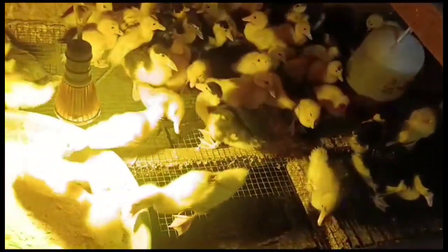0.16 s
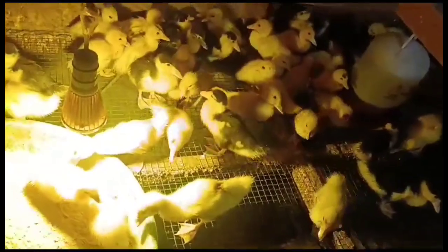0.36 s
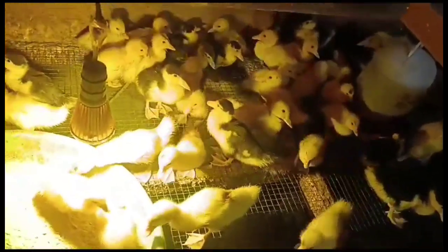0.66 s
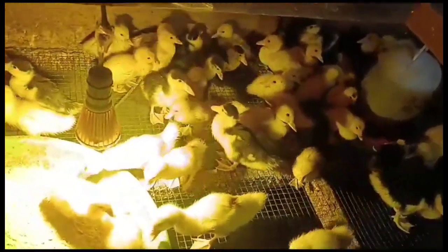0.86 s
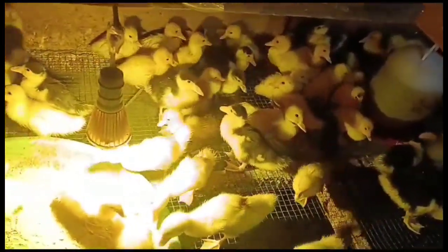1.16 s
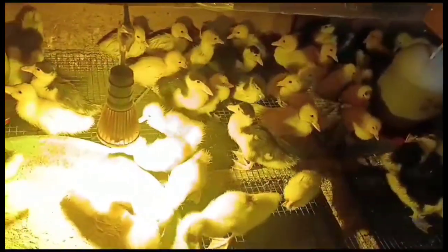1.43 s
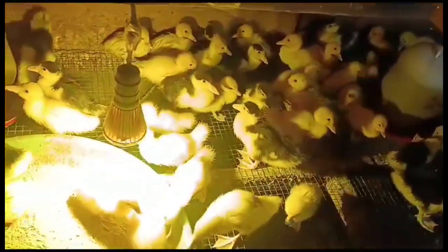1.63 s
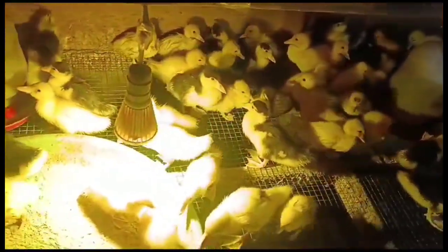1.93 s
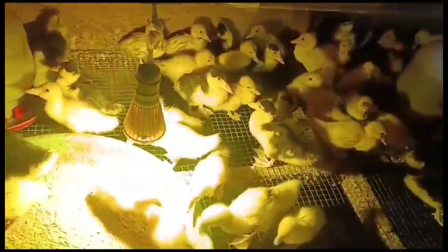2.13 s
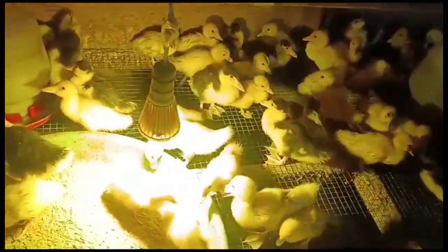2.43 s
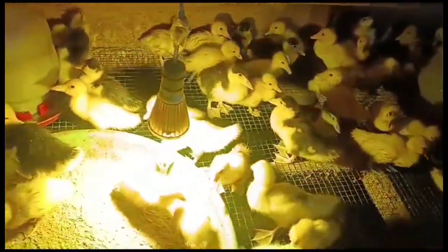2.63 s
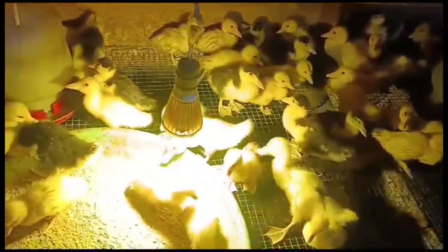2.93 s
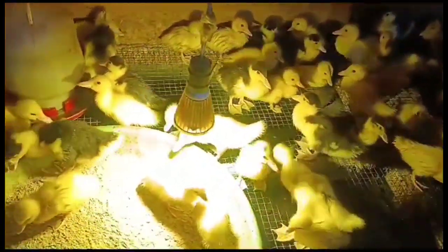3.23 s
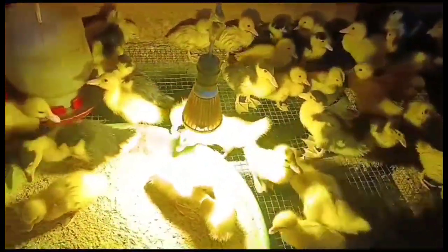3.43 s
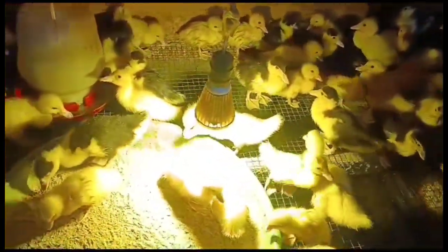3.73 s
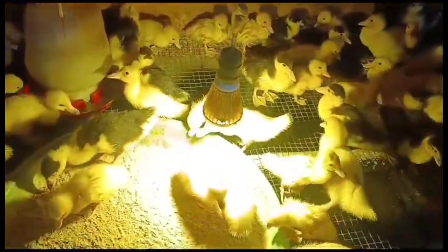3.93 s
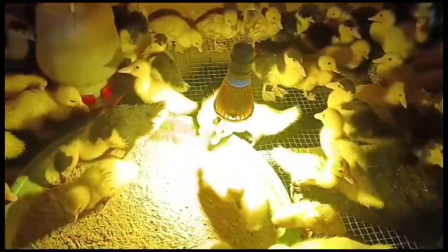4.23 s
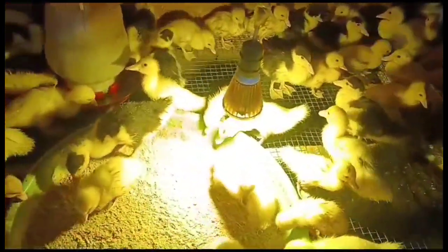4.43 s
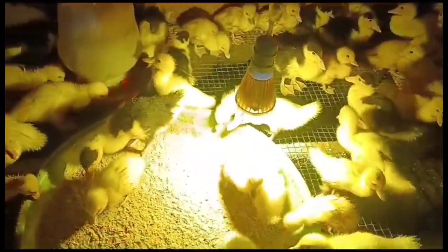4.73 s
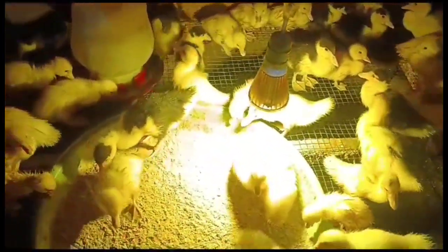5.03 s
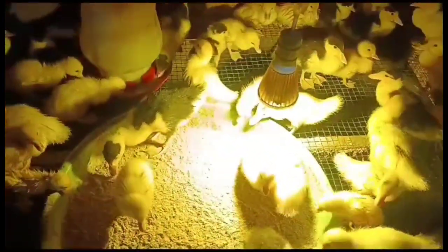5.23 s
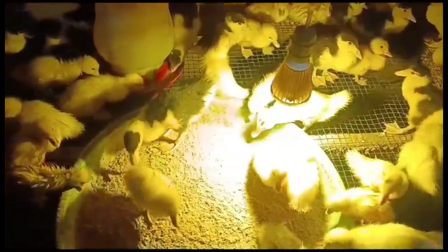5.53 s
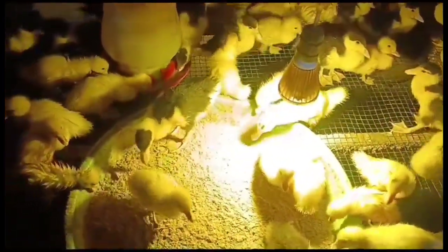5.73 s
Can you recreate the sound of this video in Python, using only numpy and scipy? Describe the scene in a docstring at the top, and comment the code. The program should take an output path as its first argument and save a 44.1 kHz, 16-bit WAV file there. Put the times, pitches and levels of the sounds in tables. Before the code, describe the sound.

Overlapping short duckling chirps, soft knocks and scratching feet over a faint shrill insect whine and a steady cricket, then a dull thud.

```python
"""A crowd of ducklings peeps in a wooden brooder, over a faint rumble, a high insect chorus and a cricket.
The cricket chirps evenly from the start and pauses briefly after 0.6 s; its chirps are shaped noise.
Peeps, murmurs and squeals are whistles on a moving pitch; the crowd is liveliest around 2 s.
Feet thump and rake, wire ticks and bodies knock throughout, most densely near 2.7 s: struck modes and noise.
A first squeal rises at 2.8 s, more from 4.8 s; a heavy bump lands at 5.03 s, then the calls thin out."""
import sys
import numpy as np
from scipy import signal
from scipy.fft import rfft, irfft, next_fast_len
from scipy.io import wavfile

SR = 44100
rng = np.random.default_rng(int(sys.argv[2]) if len(sys.argv) > 2 else 0)


def to_wav(sig):
    """Store sig (one row per channel, or 1-D mono) as 16-bit WAV at the path in sys.argv[1].

    Samples outside -1..1 are clipped; the rate is SR.
    """
    pcm = np.clip(np.atleast_2d(sig), -1, 1) * 32767
    pcm = np.round(pcm).astype(np.int16)
    wavfile.write(sys.argv[1], SR, pcm.T)  # frames by channels


N = 258867
TIME = np.arange(N) / SR  # seconds


def from_db(db):
    """Turn decibels into a gain."""
    return 10 ** (np.asarray(db) / 20)


def rms_one(x):
    """Scale a sound to unit power."""
    return x / np.sqrt(np.mean(x ** 2) + 1e-20)


def at_level(sound, db):
    """Set the level of a blow by its first fiftieth of a second."""
    return from_db(db) * sound / np.sqrt(np.mean(sound[..., :SR // 50] ** 2))


def at_hz(points, hz):
    """Read a table at any pitch, on a log-frequency axis."""
    table_hz, value = np.transpose(points)
    return np.interp(np.log(np.maximum(hz, 1)), np.log(table_hz), value)


def pan(db):
    """Left and right gains; positive decibels make the left louder."""
    return from_db(np.array([[.5], [-.5]]) * db)


def add(out, s, sound):
    """Mix a sound in at a time in seconds."""
    i = int(np.clip(s * SR, 0, N - 1))
    out[..., i:i + sound.shape[-1]] += sound[..., :N - i]


def band(x, hz, kind="band", order=2):
    """Filter that keeps only a range of pitches (Butterworth)."""
    edges = np.clip(np.sort(np.atleast_1d(hz)), 10, .45 * SR).squeeze()
    return signal.sosfilt(signal.butter(order, edges, kind, fs=SR, output="sos"), x)


def drift(rate, size=N):
    """Random wandering with a spread near 1, taking `rate` new values a second."""
    knots = np.arange(size) / SR * rate
    count = int(knots[-1]) + 2
    return np.interp(knots, np.arange(count), rng.standard_normal(count))


def colour(x, spectrum):
    """Give a signal a spectrum, silent outside the table's range; unit power."""
    size = next_fast_len(N)
    hz = np.arange(size // 2 + 1) * SR / size
    inside = (hz > spectrum[0][0]) * (hz < spectrum[-1][0])
    return rms_one(irfft(rfft(x, size) * from_db(at_hz(spectrum, hz)) * inside, size)[..., :N])


# how alike left and right are, from -1 (opposite) to 1 (same): pitch_hz, likeness
STEREO_LIKENESS = [(100, 0.83), (200, 0.95), (600, 0.42), (1200, 0.18), (2500, -0.062), (16000, -0.18)]


def two_ports(pair):
    """Blend two unrelated signals into stereo: long waves reach both microphones alike."""
    size = next_fast_len(pair.shape[1])
    mid, side = rfft(pair, size)
    alike = np.clip(at_hz(STEREO_LIKENESS, np.arange(len(mid)) * SR / size), -1, 1)
    stereo = np.sqrt((1 + alike) / 2) * mid + np.sqrt((1 - alike) / 2) * side * [[1], [-1]]
    return irfft(stereo, size)[:, :pair.shape[1]]


def brooder(x, first_echo_s=0.0068, t60_s=.25):
    """Dense reflections from the boards, fading by 60 dB in t60_s."""
    t = TIME[:SR // 2]
    echoes = two_ports(rng.standard_normal((2, len(t)))) * from_db(-60 * t / t60_s)
    echoes = echoes * (t > first_echo_s)
    echoes = echoes / np.sqrt(np.sum(echoes ** 2) / 2)
    return signal.fftconvolve(np.atleast_2d(x), echoes, axes=1)[:, :N]


# which side the top treble favours: pitch_hz, left_minus_right_db
TREBLE_BALANCE = [(4000, 0), (6000, -2), (8000, 0), (9000, 7), (11000, 7), (13000, 0)]


def sided(pair):
    """Give a stereo signal the microphones' treble balance."""
    size = next_fast_len(N)
    spectrum = rfft(pair, size)
    hz = np.arange(spectrum.shape[1]) * SR / size
    return irfft(spectrum * pan(at_hz(TREBLE_BALANCE, hz)), size)[:, :N]


# spectrum of the shed's air: pitch_hz, relative_level_db
AIR_SPECTRUM = [(20, -35), (45, -15.5), (72, 2), (100, -9), (150, 4.5), (300, -12), (600, -21), (1100, -15),
                (2400, -9.5), (3500, -39), (5000, -20), (7500, -22), (8300, -39.5), (13800, -35),
                (15200, -23)]


def air(level_db=-58.5, waver_db=3.0):
    """Low rumble and faint hiss of the shed: coloured noise of wavering strength."""
    noise = two_ports(rng.standard_normal((2, N)))
    return from_db(level_db + waver_db * drift(8.1)) * colour(noise, AIR_SPECTRUM)


# spectrum of the distant insects: pitch_hz, relative_level_db
CHORUS_SPECTRUM = [(5600, -40), (6200, -8), (6550, 15), (6950, 12), (7250, 11), (7550, 7.5), (7850, -4),
                   (8100, -42)]


def insect_chorus(level_db=-58.5, side_db=-11.5):
    """Distant insects merge into a shrill band of noise, louder on the right."""
    return from_db(level_db) * pan(side_db) * colour(rng.standard_normal((2, N)), CHORUS_SPECTRUM)


# runs of chirps: first_chirp_middle_s, end_s, chirp_spacing_s
CRICKET_BOUTS = [(.006, .62, .114), (.834, 5.87, .112)]
# strength of the chirps: time_s, relative_level_db
CRICKET_STRENGTH = [(0, -54), (3, -54), (3.5, -51.5), (4.3, -51), (5, -52.5), (5.87, -53.5)]
# spectrum of the cricket's wing: pitch_hz, relative_level_db
WING_SPECTRUM = [(6050, -3), (6350, 4), (6600, 3.5), (6900, 8.5), (7100, 12.5), (7300, -11), (7600, -27.5),
                 (7900, -32.5)]


def cricket(chirp_s=.06, side_db=-6, tail_db=-9):
    """A cricket's file rasps its wing: evenly spaced bursts of wing-coloured noise."""
    stroke = np.zeros(N)
    for first, end, period in CRICKET_BOUTS:
        for s in np.arange(first, end, period):
            add(stroke, s - chirp_s / 2, np.hanning(int(chirp_s * SR)) ** .5)
    strength_db = np.interp(TIME, *np.transpose(CRICKET_STRENGTH))
    rasp = stroke * colour(rng.standard_normal((2, N)), WING_SPECTRUM) * from_db(strength_db)
    return pan(side_db) * (rasp + from_db(tail_db) * brooder(rasp))


def patter(count=700, level_db=-58, spread_db=4.5, cycles=8, tilt_db_per_octave=-2.46):
    """Many small feet and bills tap at random; each spot rings briefly at its own pitch."""
    out = np.zeros(N)
    t = TIME[:SR // 8]
    for when, height, strength in rng.random((count, 3)):
        hz = 170 * 11 ** height
        age = t * hz / cycles * np.pi
        # most taps are weak, a few strong
        db = spread_db * min(-np.log(1 - strength), 2.5) + tilt_db_per_octave * np.log2(hz)
        ring = np.sqrt(age) * np.exp(-age) * np.sin(2 * np.pi * hz * t)
        add(out, when * N / SR, from_db(db) * ring)
    return from_db(level_db) * rms_one(out + brooder(out))


def rustle(level_db=-15, clump_db=6.5):
    """Down and feet brush the feed and the mesh: banded noise in clumps."""
    brush = rng.standard_normal((2, N)) * from_db(clump_db * drift(45))
    return from_db(level_db) * rms_one(band(two_ports(brush), [800, 4800], order=4))


# claws on the wire: start_s, relative_level_db
CLAW_TICKS = [(.0453, -57), (.2239, -61), (1.618, -54), (1.6915, -58), (2.2265, -62), (2.3077, -59),
              (2.4264, -56.5), (2.598, -51), (2.812, -53), (3.045, -55.5), (3.1572, -54), (3.6066, -63),
              (4.4877, -57), (4.9242, -54), (5.2525, -51), (5.7884, -51), (5.8144, -50)]
# spectrum of the ticks as picked up, with the microphone's peak near 15 kHz: pitch_hz, relative_level_db
TICK_SPECTRUM = [(8300, -10), (10000, 8), (11500, -1.5), (13500, -15.5), (15000, 20), (16000, -5)]


def wire_ticks(level_db=-72, rise_s=0.0059, room_db=-14, count=90, faint_db=-72,
               spread_db=6.5, grain_db=2.5, uneven_db=11.5):
    """Claws scrape the mesh in short gritty noise bursts, each its own brightness; faint ones fall at random."""
    scrape = np.zeros((2, N))
    age = TIME[:SR // 8] / rise_s
    faint = []
    for when, strength in rng.random((count, 2)):
        faint.append((when * N / SR, faint_db + spread_db * (2 * strength - 1)))
    for s, db in [*CLAW_TICKS, *faint]:
        grit = from_db(db + grain_db * drift(400, size=len(age)))
        burst = grit * age * np.exp(-age) * rng.standard_normal((2, len(age)))
        bright = from_db(uneven_db * rng.uniform(-1, 1))
        high = band(burst, 12000, "high", order=3)
        low = band(burst, 12000, "low", order=3)
        add(scrape, s, bright * high + low / bright)
    return from_db(level_db) * colour(scrape + from_db(room_db) * brooder(scrape), TICK_SPECTRUM)


def modes(table):
    """One decaying sine for each way the wood can ring."""
    hz, db, t60 = np.transpose(table)[:, :, None]
    t = TIME[:SR // 2]
    return from_db(db - 60 * t / t60) * np.sin(2 * np.pi * hz * t)


# ringing tones of the floor: pitch_hz, relative_level_db, time_to_fall_60_db_s
FLOOR_MODES = [(76, -14, .2), (147.8, 4.5, .17), (170, -2, .12), (210, 4, .15), (242.7, -3, .12),
               (283, -1.5, .17), (350, -3, .1), (403.7, -6, .08), (485, -6.5, .08), (578, -7, .11)]


def floor_blow(contact_hz, lowest_hz, uneven_db=11.0):
    """The floor rings in its modes; a soft contact reaches only the low ones."""
    strengths = from_db(uneven_db * rng.standard_normal(len(FLOOR_MODES)))
    ring = band(strengths @ modes(FLOOR_MODES), contact_hz, "low", order=3)
    return band(ring, lowest_hz, "high", order=3)


# footfalls on the floor: start_s, level_db
FOOTFALLS = [(0.335, -40.5), (0.646, -48), (1.101, -49.5), (1.289, -45.5), (1.615, -40.5), (1.783, -47.5),
             (2.07, -47), (2.368, -51), (2.79, -44), (2.85, -47.5), (3.222, -41.5), (3.543, -44.5),
             (4.898, -46.5), (5.19, -50.5)]
# a heavy bump and its deeper rebounds: start_s, level_db, lowest_hz, contact_cutoff_hz
HEAVY_BUMPS = [(5.025, -22.5, 240, 445), (5.037, -27, 172, 474), (5.054, -21, 162, 310)]


def thumps(room_db=-17, webbed_foot_hz=179):
    """Soft footfalls, and the heavy bump with its rebounds, make the floor ring."""
    out = np.zeros(N)
    for s, db in FOOTFALLS:
        add(out, s, at_level(floor_blow(webbed_foot_hz, lowest_hz=69), db))
    for s, db, lowest_hz, contact_hz in HEAVY_BUMPS:
        add(out, s, at_level(floor_blow(contact_hz, lowest_hz, uneven_db=-2.0), db))
    return out + from_db(room_db) * brooder(out)


def rattle(low_hz, high_hz, t60, rise_s=0.0016, grain_db=1.5, splinter_db=-28):
    """A dying run of small, uneven bursts of noise, sounding mainly in the given range."""
    t = TIME[:SR // 3]
    grain = from_db(grain_db * drift(606.4, size=len(t)))
    contacts = two_ports(rng.standard_normal((2, len(t))) * grain)
    force = contacts * from_db(-60 * t / t60) * (1 - np.exp(-t / rise_s))
    return band(force, [low_hz, high_hz], order=3) + from_db(splinter_db) * band(force, [200, 3500])


# scratches on the wire mesh: start_s, level_db, lowest_hz, highest_hz, time_to_fall_60_db_s
WIRE_SCRATCHES = [(.003, -47, 5000, 6300, 0.13), (.146, -43.5, 3500, 5560, 0.16),
                  (.456, -40.5, 3520, 5800, 0.055), (1.4, -55, 2780, 5400, 0.036),
                  (2.294, -53, 2390, 5160, .25), (2.656, -51, 4500, 6160, 0.24),
                  (2.807, -47.5, 3500, 6500, 0.12), (3.158, -50.5, 3150, 4040, .15),
                  (3.965, -54.5, 2750, 5100, 0.99), (4.178, -37, 3330, 4690, 0.22),
                  (4.214, -48.5, 4180, 6600, 0.14), (5.599, -53.5, 3750, 5300, 0.21),
                  (5.756, -46.5, 2480, 4740, 0.53)]


def scratches(room_db=-5.0, clump_db=2.5):
    """Claws scratch across the wire mesh: bright, uneven rattles."""
    out = np.zeros((2, N))
    for s, db, low_hz, high_hz, t60 in WIRE_SCRATCHES:
        sound = rattle(low_hz, high_hz, t60)
        clumps = from_db(clump_db * drift(180, size=sound.shape[1]))
        add(out, s, at_level(sound * clumps, db))
    return out + from_db(room_db) * brooder(out.mean(axis=0))


# ringing tones of the wooden frame: pitch_hz, relative_level_db, time_to_fall_60_db_s
FRAME_MODES = [(381, 22, 0.05), (584, -23, 0.12), (756, 6, 0.1), (825, -36, 0.27), (1052, 2.5, 0.14),
               (1135, -6.5, 0.094), (1322, -4, 0.057), (1770, -18.5, 0.079), (2070, 12, 0.062)]


def frame_ring(force):
    """The frame rings on after a blow, its modes in a random mix of signs for each spot struck."""
    ring = rng.choice([-1, 1], (2, len(FRAME_MODES))) @ modes(FRAME_MODES)
    rung = signal.fftconvolve(force, ring, axes=1)[:, :force.shape[1]]
    return rms_one(rung) * np.std(force)


# bills and bodies on frame and feeder; the row at 1.4 s is a loud murmur's burst:
# start_s, level_db, lowest_hz, highest_hz, time_to_fall_60_db_s
KNOCKS_AND_BURST = [(.221, -38.5, 1220, 2840, 0.12), (.331, -30.5, 344, 735, 0.029),
                    (.336, -39.5, 1200, 1720, 0.06), (0.596, -51, 523, 1980, 0.1),
                    (.668, -53, 580, 845, 0.17), (.769, -55.5, 616, 900, .11), (.806, -51, 396, 810, .13),
                    (.869, -43.5, 596, 870, 0.047), (1.4, -32.5, 1825, 2540, 0.1),
                    (1.616, -33.5, 440, 1760, 0.073), (1.617, -35, 348, 516, 0.087),
                    (1.627, -38, 1120, 1540, 0.089), (1.936, -47.5, 876, 1620, 0.1),
                    (2.047, -43, 1150, 4200, 0.32), (2.237, -48, 1410, 2210, 0.1),
                    (2.425, -45.5, 596, 1500, 0.24), (2.439, -44.5, 324, 610, 0.16),
                    (2.728, -32, 650, 1190, 0.069), (2.734, -28.5, 980, 2600, .065),
                    (2.748, -29.5, 714, 2270, 0.062), (2.761, -38.5, 2300, 3300, 0.13),
                    (2.77, -38, 940, 1410, 0.054), (2.786, -38, 570, 2100, .2),
                    (3.934, -47, 910, 1114, 0.15), (4.044, -45.5, 1260, 1600, 0.056),
                    (4.1, -54.5, 950, 1160, 0.24), (4.217, -58.5, 300, 490, 0.033),
                    (4.236, -58.5, 500, 1540, 0.021), (4.688, -55, 720, 1530, 0.36),
                    (5.035, -34, 1200, 1640, 0.052), (5.763, -49.5, 380, 1380, 0.43)]


def knocks(room_db=-7.5, ring_db=-5.5):
    """Knocks rattle the struck part, deep ones ring the frame; one murmur's burst is made like a rattle."""
    out = np.zeros((2, N))
    for s, db, low_hz, high_hz, t60 in KNOCKS_AND_BURST:
        sound = rattle(low_hz, high_hz, t60)
        if low_hz < 1500:
            sound = sound + from_db(ring_db) * frame_ring(sound)
        add(out, s, at_level(sound, db))
    return out + from_db(room_db) * brooder(out.mean(axis=0))


def whistle(hz, swell, fade, hoarse, overtone_db, waver=0.021, quaver=0.013, flutter_db=3.5,
            rasp_hz=850, rasp_jitter=0.248, rough_waver=0.065):
    """A tone that swells and fades along a pitch contour; a hoarse throat shakes it and adds side tones."""
    size = len(hz)
    u = np.linspace(0, 1, size)
    shake = (waver + rough_waver * hoarse) * drift(699.0, size=size) + quaver * drift(67.7, size=size)
    phase = 2 * np.pi * np.cumsum(hz * (1 + shake)) / SR
    flutter = from_db(flutter_db * drift(249, size=size))
    effort = u ** abs(swell) * (1 - u) ** abs(fade) * flutter
    buzz_hz = rasp_hz * (1 + rasp_jitter * drift(302, size=size))
    buzz = np.sin(2 * np.pi * np.cumsum(buzz_hz) / SR)
    tone = np.sin(phase) + from_db(overtone_db) * np.sin(2 * phase)
    return rms_one(effort * (1 + hoarse * buzz) * tone)


def arch(length, crest):
    """Pitch contour one unit high: it climbs to a rounded crest and sinks again."""
    u = np.linspace(0, 1, int(length * SR))
    return .5 * np.cos(np.pi * (u - crest) / max(crest, 1 - crest))


def falling_peep(length, hz, hoarse=0.12, usual_hz=3410, usual_s=0.0524, fall_octaves=0.2773,
                 deepening=2.15, crest=0.198):
    """The usual call turns over and drops steeply: the lower it lies, the further and the clearer."""
    # shorter peeps fall less
    fall = fall_octaves * (usual_hz / hz) ** deepening * np.sqrt(length / usual_s)
    throat = hoarse * min(hz / usual_hz, 1) ** 6
    return whistle(hz * 2 ** (fall * arch(length, crest)), swell=1.3, fade=0.51, hoarse=throat,
                   overtone_db=-35.5, waver=0.0098, flutter_db=2.5)


def murmur(length, hz, rest_hz=2156, settles=.3):
    """A relaxed, clear call; above the throat's resting pitch it slides part of the way down to it."""
    glide = settles * min(np.log2(rest_hz / hz), 0)
    slide = np.linspace(-.5, .5, int(length * SR))
    return whistle(hz * 2 ** (glide * slide), swell=0.82, fade=0.74, hoarse=0.034,
                   overtone_db=-33.5, flutter_db=3.0)


def squeal(length, hz, rise, crest=.72):
    """A strained protest shoots upwards and hooks over at the top."""
    return whistle(hz * 2 ** (rise * arch(length, crest)), swell=.55, fade=.65, hoarse=.12,
                   overtone_db=-30, waver=.007, flutter_db=2.0)


def far_ducklings(count=380, spread_db=15, lowest_hz=1850, range_hz=2750, edge_db=-16,
                  shortest_s=0.02, longer_s=.035, direct_db=-3):
    """The far crowd, blurred by reflection: high voices peep, low ones murmur, those between are loudest."""
    out = np.zeros((2, N))
    for k, (when, size, height, strength, side) in enumerate(rng.random((count, 5))):
        hz = lowest_hz + range_hz * height
        voice = falling_peep if hz > 2500 else murmur
        db = spread_db * strength + edge_db * abs(height - .4)
        call = from_db(db) * voice(shortest_s + longer_s * size, hz)
        # calls follow one another evenly, each shifted by chance
        start_s = (k + 2 * when - 1) / count * N / SR
        add(out, start_s, pan(20 * (side - .5)) * call)
    return rms_one(brooder(out[0]) + brooder(out[1]) + from_db(direct_db) * out)


def placed(call, side_db, wet, lag_s=.000075, wall_db=-4, wall_delay_s=0.016):
    """A bird at its spot: one microphone hears it sooner, the nearest wall repeats it, the boards blur it."""
    wet = np.clip(wet, .02, .98)
    t = TIME[:len(call)]
    shifted = np.interp(t - lag_s * rng.choice([-1, 1]), t, call)
    direct = rms_one(pan(side_db)) * np.array([call, shifted])
    echoes = brooder(call, first_echo_s=0.0035)
    for port in echoes:
        add(port, wall_delay_s * (.5 + rng.random()), from_db(wall_db) * call)
    echoes = pan(side_db / 2) * echoes
    # share the call's power between echoes and direct sound
    out = echoes * np.sqrt(wet * np.sum(direct ** 2) / np.sum(echoes ** 2))
    add(out, 0, np.sqrt(1 - wet) * direct)
    return out


# In these three tables relative_level_db is before the common trim, and reflected_share is of power, 0 to 1.
# high falling peeps: start_s, length_s, middle_hz, relative_level_db, left_minus_right_db, reflected_share
FALLING_PEEPS = [(0.134, 0.038, 3950, -51, -2, .7), (0.482, 0.039, 3300, -55, -1, 0.7),
                 (0.606, 0.0245, 3350, -48.5, 0, 0.4), (0.737, 0.031, 3380, -44, 0, 0.56),
                 (0.875, 0.029, 3820, -50, -2, 0.27), (0.992, 0.025, 6020, -54.5, -8, 0.9),
                 (1.048, 0.028, 3410, -60, -4, 0.04), (1.224, 0.032, 3365, -42, 0, .3),
                 (1.296, 0.07, 2985, -48.5, 1, 0.7), (1.335, 0.038, 3550, -47, -2, 0.5),
                 (1.482, 0.051, 3355, -44, -7, 0.5), (1.521, 0.035, 3400, -44, -5, .55),
                 (1.628, 0.03, 3463, -36.5, -7, 0.53), (1.723, 0.028, 3630, -42.5, -1, 0.06),
                 (1.833, 0.029, 3564, -39.5, -0.5, 0.6), (1.852, 0.052, 3090, -29.5, -5, 0.1),
                 (1.947, 0.04, 3340, -33, -5, 0.47), (1.989, 0.03, 3034, -40.5, -1, 0),
                 (2.081, 0.031, 3950, -41.5, 4, 0.4), (2.098, 0.047, 3406, -34.5, -2, 0.43),
                 (2.155, 0.026, 3080, -42.5, -3, 0.3), (2.261, 0.029, 3140, -41, -6, 0.44),
                 (2.376, 0.035, 3310, -42.5, -5, 0.65), (2.411, 0.041, 3260, -36.5, -1, 0.26),
                 (2.603, 0.029, 3370, -35.5, -8, 0.28), (2.831, .042, 2957, -44.5, 3, 0),
                 (2.892, 0.04, 4180, -52.5, 0, .45), (3.175, 0.039, 3110, -53, -3, .4),
                 (3.198, 0.048, 3730, -55, -5, .8), (3.33, 0.035, 4290, -49.5, -2, 0.15),
                 (3.361, 0.05, 3690, -57, 4, .5), (3.385, 0.056, 3230, -53, 1, 0.4),
                 (3.567, 0.047, 2980, -39, -6, .2), (3.689, 0.026, 3470, -34.5, -1, 0.07),
                 (3.705, 0.033, 2790, -39.5, -4, 0.11), (3.808, 0.037, 3250, -47.5, -10, 0.5),
                 (3.926, 0.05, 3500, -52, -4, 0.5), (4.088, 0.039, 3640, -51, 2, 0.4),
                 (4.136, 0.057, 3745, -46.5, 4, 0.3), (4.266, 0.065, 3610, -46.5, 1, 0.34),
                 (4.491, 0.048, 3640, -45, -3, 0.5), (4.756, 0.046, 3720, -34.5, -1, .45),
                 (4.999, 0.048, 3930, -30, -3.5, 0.26)]
# soft, nearly level contact calls: start_s, length_s, middle_hz, relative_level_db, left_minus_right_db
SOFT_MURMURS = [(.0, 0.0088, 2290, -39.5, 2), (0.152, 0.029, 2720, -43.5, -7),
                (0.246, 0.05, 2852, -37.5, -11), (0.292, 0.046, 2030, -51.5, -2),
                (0.389, 0.096, 2333, -47, -3), (0.544, 0.044, 2576, -40.5, -1),
                (0.593, 0.086, 2520, -44.5, 6), (0.645, 0.051, 2684, -41, 1), (1.117, 0.063, 2578, -48, 3),
                (1.376, 0.049, 2500, -35.5, 1), (1.602, 0.048, 2553, -36.5, 7),
                (1.738, 0.04, 2331, -32.5, 0), (1.795, 0.056, 2294, -37, 0), (2.085, 0.044, 2050, -39.5, 3),
                (2.218, 0.063, 2625, -42.5, 0), (2.642, 0.14, 1852, -48, 14), (2.858, 0.035, 2733, -41, -3),
                (3.079, 0.03, 2326, -43, 5), (3.113, 0.031, 2305, -53.5, -2),
                (3.614, 0.044, 2430, -42.5, 3), (3.635, 0.056, 793, -58, -5), (3.888, 0.057, 778, -53, -8),
                (3.766, 0.038, 2062, -47, 3), (3.957, 0.047, 2397, -40.5, -3),
                (4.058, 0.063, 2536, -48, -6), (4.257, 0.04, 2480, -37, 1), (4.307, 0.027, 2270, -38, 6),
                (4.33, 0.073, 2171, -42, -5), (4.414, 0.06, 2726, -53, 20), (4.537, 0.11, 2260, -39.5, 2),
                (4.853, 0.058, 2430, -39.5, 9), (4.931, 0.098, 2537, -47.5, 6),
                (5.059, 0.094, 2023, -50.5, -4), (5.121, 0.038, 889, -55, 1), (5.323, 0.16, 2597, -51.5, 0),
                (5.576, 0.043, 2390, -43, 1), (5.618, 0.074, 3760, -55, -9), (5.749, 0.094, 2157, -50.5, 8)]
# rising squeals of a jostled bird: start_s, length_s, middle_hz, relative_level_db, left_minus_right_db,
# reflected_share, rise_octaves
RISING_SQUEALS = [(2.793, 0.035, 3137, -34, -5, 0.14, 0.39), (4.823, 0.033, 2990, -36, 0, 0.67, 0.37),
                  (4.894, 0.022, 3030, -35.5, -5, 0.27, 0.4), (4.96, 0.0198, 2860, -34.5, 5, .4, 0.406),
                  (5.008, .042, 3030, -30, -7, 0.5, 0.28)]


def near_ducklings(trim_db=-0.5, murmur_wet=0.35):
    """The birds close by; those further into the pen are more blurred by the boards."""
    out = np.zeros((2, N))
    for s, length, hz, db, side_db, wet in FALLING_PEEPS:
        add(out, s, from_db(db) * placed(falling_peep(length, hz), side_db, wet))
    for s, length, hz, db, side_db in SOFT_MURMURS:
        add(out, s, from_db(db) * placed(murmur(length, hz), side_db, murmur_wet))
    for s, length, hz, db, side_db, wet, rise in RISING_SQUEALS:
        add(out, s, from_db(db) * placed(squeal(length, hz, rise), side_db, wet))
    return from_db(trim_db) * out


# excitement of the far crowd: time_s, level_db
CROWD_EXCITEMENT = [(0, -51), (.7, -61), (1.0, -61.5), (1.3, -60.5), (1.55, -55.5), (2.05, -47.5),
                    (2.3, -50), (2.55, -59.5), (2.85, -51.5), (3.02, -61.5), (3.25, -56.5), (3.55, -61.5),
                    (4.15, -51), (4.6, -58), (4.95, -51), (5.2, -58), (5.87, -59)]


def scene(patter_follows=0.06):
    """All the sounds together; the livelier the crowd, the more it chatters, rustles and patters."""
    lively_db = np.interp(TIME, *np.transpose(CROWD_EXCITEMENT))
    background = sided(wire_ticks() + air()) + insect_chorus() + cricket()
    feet = from_db(patter_follows * (lively_db - lively_db.mean())) * patter()
    crowd = from_db(lively_db) * (far_ducklings() + rustle())
    return background + feet + thumps() + scratches() + knocks() + crowd + near_ducklings()


def record(dry, cutoff_hz=15900):
    """The top is cut steeply."""
    return signal.sosfilt(signal.ellip(10, .1, 80, cutoff_hz, fs=SR, output="sos"), dry)


dry = scene()
out = record(dry)
to_wav(out)
```